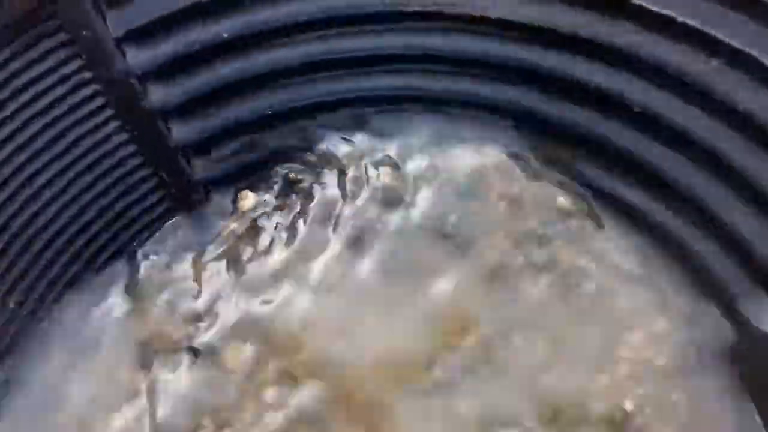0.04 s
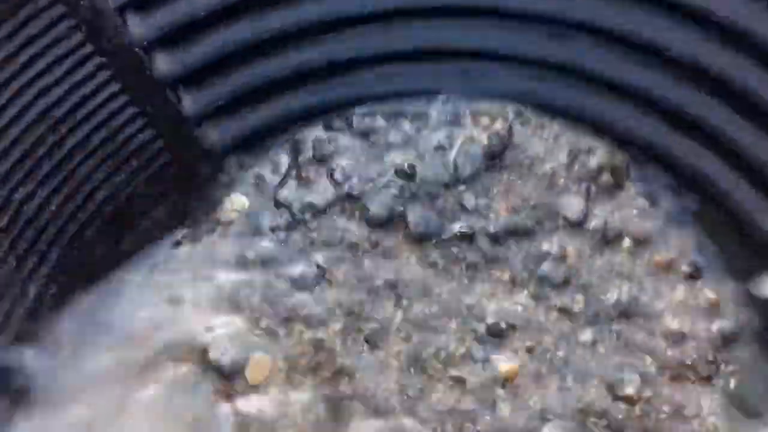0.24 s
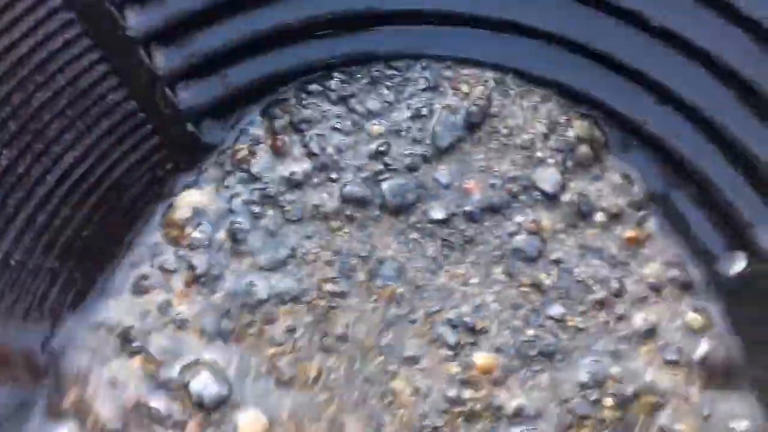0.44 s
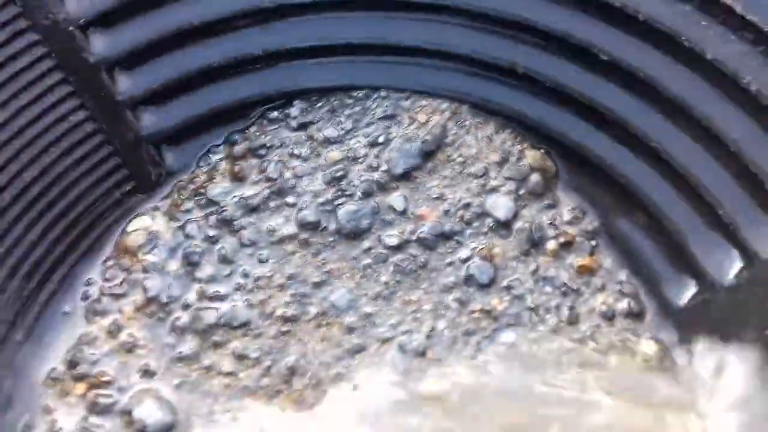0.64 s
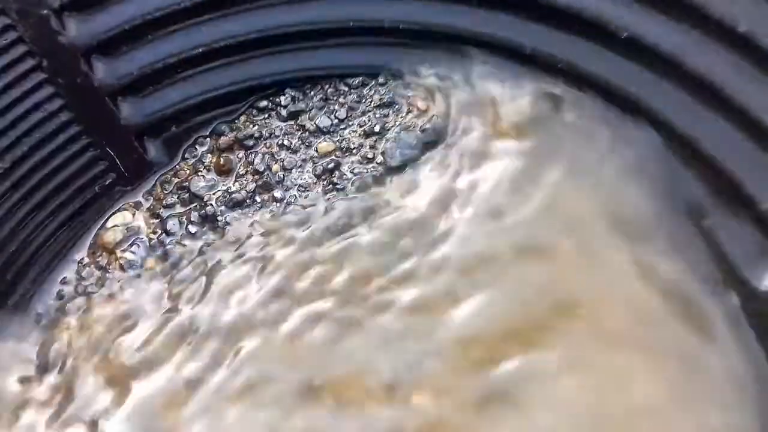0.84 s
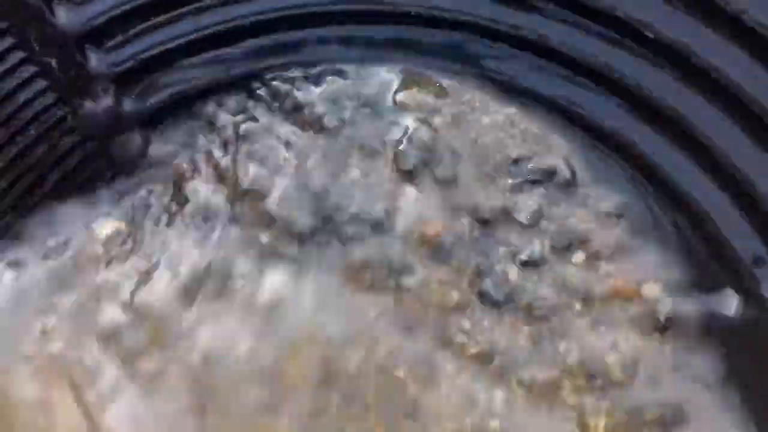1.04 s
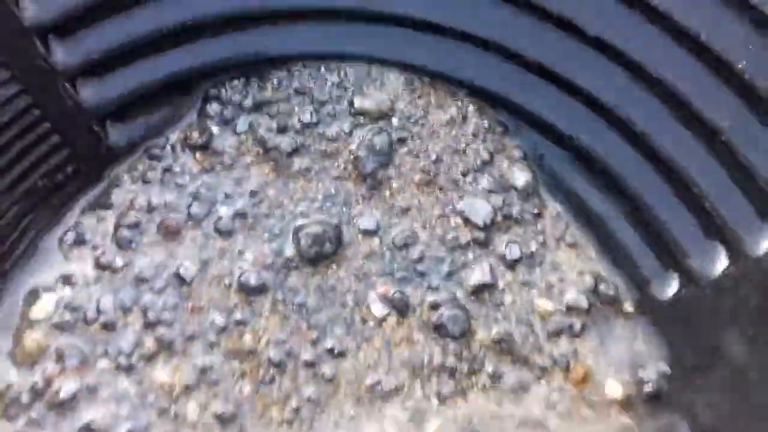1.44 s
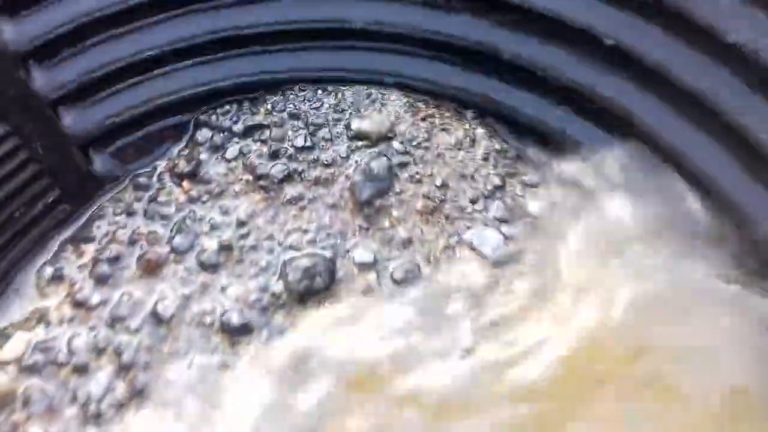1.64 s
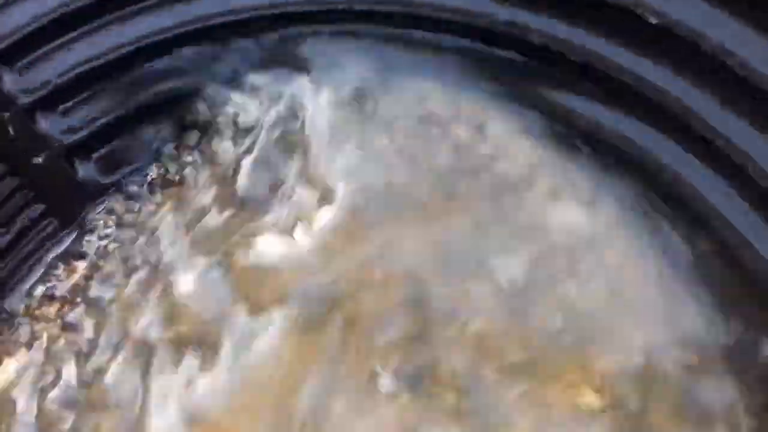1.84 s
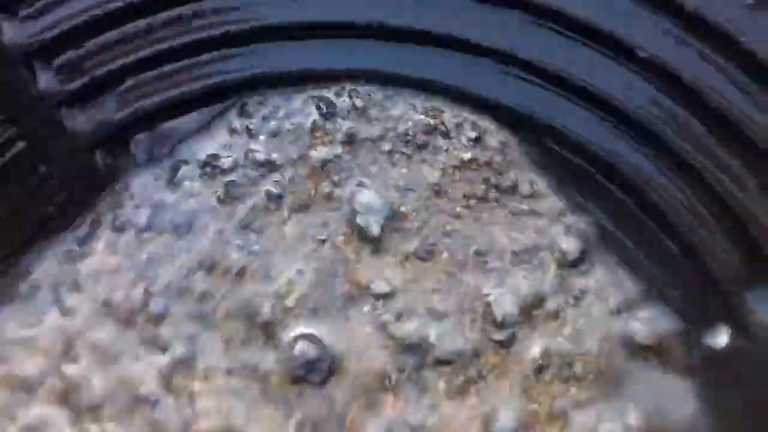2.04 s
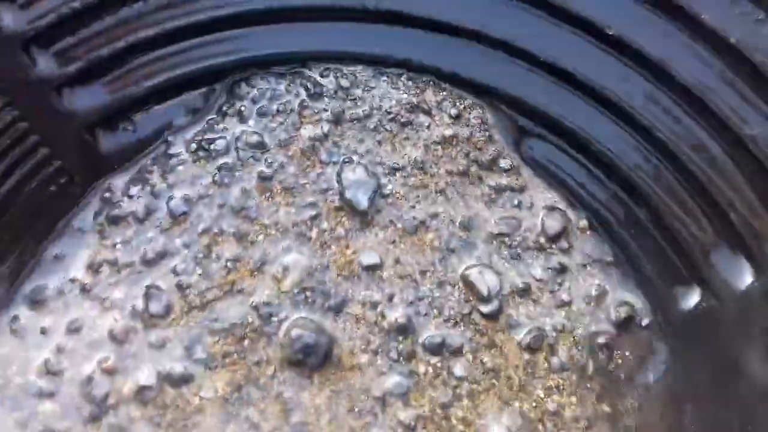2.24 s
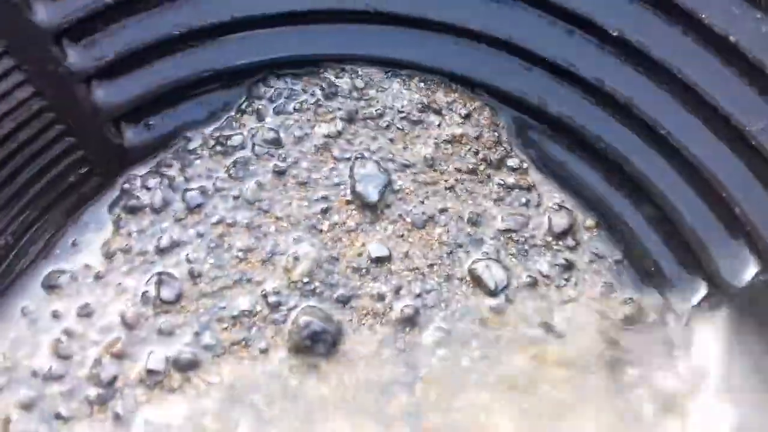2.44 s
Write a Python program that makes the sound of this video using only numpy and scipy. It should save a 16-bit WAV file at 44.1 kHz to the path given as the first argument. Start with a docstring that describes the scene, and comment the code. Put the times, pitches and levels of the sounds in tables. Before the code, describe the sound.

Close to a gold pan outdoors, wet grit swishes over the ribs in three quick surges. Pebbles knock and sand hisses as the water drains, while light trickling, small bubbles and a few stone ticks fill the gaps.

```python
"""Outdoors, close to a ribbed gold pan: muddy water and gravel are swirled round it three times.
Each swirl drags a sheet of grit over the pan, whose broad resonances colour it; larger pebbles knock
and bare sand hisses. Water trickles, gurgles and bubbles. Stones tick on the pan, which is bumped twice.
A faint low rumble and hiss lie behind."""
import sys
import numpy as np
from scipy import signal
from scipy.fft import rfft, irfft, next_fast_len
from scipy.io import wavfile
from scipy.ndimage import map_coordinates

SR = 44100
rng = np.random.default_rng(int(sys.argv[2]) if len(sys.argv) > 2 else 0)


def unload_wav(signal):
    """Save mono or channel-first audio to the path in sys.argv[1] as 16-bit WAV at rate SR, clipped to [-1, 1]."""
    wavfile.write(
        sys.argv[1],
        SR,
        np.round(np.clip(np.atleast_2d(signal).T, -1, 1) * 32767).astype(np.int16),
    )


N = 114660
TIME_S = np.arange(N) / SR
EVENT_S = TIME_S[:SR // 5]  # time axis of one short sound


def from_db(db):
    """Decibels to gain."""
    return 10 ** (np.asarray(db) / 20)


def rms_one(x):
    """Scale to unit rms."""
    return x / np.sqrt(np.mean(x ** 2) + 1e-20)


def envelope(points):
    """Gain from (t/s, level/dB) points, silent outside them."""
    s, db = np.transpose(points)
    return from_db(np.interp(TIME_S, s, db, left=-120, right=-120))


def drift(rate_hz):
    """Slow random curve, rms 1."""
    hop, settle = 40, 2000
    r = np.exp(-2 * np.pi * rate_hz * hop / SR)
    noise = rng.standard_normal(N // hop + settle + 2)
    slow = signal.lfilter([1], [1, -2 * r, r * r], noise)[settle:]
    return np.interp(np.arange(N) / hop, np.arange(len(slow)), rms_one(slow))


def colour(x, points, peaks=()):
    """Minimum-phase filter from (f/Hz, gain/dB) points and (f/Hz, width/Hz, boost/dB) resonances."""
    size = 2 * next_fast_len(x.shape[-1] // 2 + 4096)
    f = np.arange(size // 2 + 1) * SR / size + 1e-3
    hz, db = np.transpose(points)
    gain = from_db(np.interp(np.log(f), np.log(hz), db))
    for centre_hz, width_hz, boost_db in peaks:
        detune = 2 * (f - centre_hz) / width_hz
        gain *= np.sqrt(1 + (from_db(boost_db) ** 2 - 1) / (1 + detune ** 2))
    cepstrum = irfft(np.log(gain))
    cepstrum[1:size // 2] *= 2
    cepstrum[size // 2 + 1:] = 0
    return irfft(rfft(x, size) * np.exp(rfft(cepstrum)))[..., :x.shape[-1]]


def ring(clicks, hz, t60_s):
    """Resonator: a unit click starts a decaying sine of height 1."""
    r, w = from_db(-60 / (t60_s * SR)), 2 * np.pi * hz / SR
    return signal.lfilter([0, np.sin(w)], [1, -2 * r * np.cos(w), r * r], clicks + 1e-18)


def ping(hz, t60_s, rise=0, attack_cycles=1.35):
    """Swelling, decaying sine; pitch gains the fraction `rise` over t60."""
    t = EVENT_S
    swell = 1 - np.exp(-(t * hz / attack_cycles) ** 2)
    glide = 1 + rise * np.minimum(t / t60_s, 2) / 2
    return swell * from_db(-60 * t / t60_s) * np.sin(2 * np.pi * hz * t * glide)


def grains(per_s, spread_db, cycles, low_hz, high_hz, pitches):
    """Random clicks, each ringing at one of several pitches with a t60 of `cycles`; rms 1."""
    sizes = from_db(spread_db * np.minimum(rng.exponential(1, N), 4)) * rng.choice([-1, 1], N)
    clicks = sizes * (rng.random(N) < per_s / SR)
    pitch_index = rng.integers(0, pitches, N)
    out = np.zeros(N)
    for k, hz in enumerate(np.geomspace(low_hz, high_hz, pitches)):
        ringing = ring(clicks * (pitch_index == k), hz, cycles / hz)
        out += np.sqrt(hz) * rms_one(np.diff(ringing, prepend=0))  # sqrt evens the spectrum
    return rms_one(out)


def add(out, start_s, x):
    """Mix x in at start_s."""
    i = int(start_s * SR)
    out[i:i + len(x)] += x[:N - i]


def background(rumble_db=-61, hiss_db=-67):
    """Centred rumble; independent hiss in each ear."""
    # spectra: f/Hz, gain/dB
    rumble_eq = [(25, -60), (60, -21), (95, -6), (130, 3), (170, -8), (300, -8.5), (700, -5), (1500, -7.5),
                 (4000, -19), (8000, -55)]
    hiss_eq = [(30, -25), (70, 7), (140, 9.5), (500, 9.5), (2000, -3), (5500, -4), (8000, -1), (10000, -10),
               (12000, -1), (16000, -8)]
    rumble = rms_one(colour(rng.standard_normal(N), rumble_eq))
    hiss = rms_one(colour(rng.standard_normal((2, N)), hiss_eq))
    return from_db(rumble_db) * rumble + from_db(hiss_db) * hiss


def trickle(wash_db=4):
    """Running water: small bubbles ring on a soft wash, coloured by the pan."""
    flow = [(0.0, -48.5), (0.07, -50), (0.6, -50), (0.78, -54.5), (0.96, -55.5), (1.05, -48.5), (1.5, -54),
            (1.6, -55.5), (1.86, -55.3), (2.35, -52.5), (2.48, -62), (2.52, -58.5), (2.6, -60)]  # t/s, level/dB
    water_eq = [(120, -13), (200, -22), (450, -11.5), (700, 0.5), (900, -5.5), (1500, -2.5), (2300, 1.5),
                (3300, -4.5), (4200, -9), (5100, -27.5), (8000, -41), (10000, -32)]  # f/Hz, gain/dB
    pan_modes = [(624, 116, 4), (2200, 110, 5.5)]  # f/Hz, width/Hz, boost/dB
    fizz = grains(per_s=2500, spread_db=0, cycles=33, low_hz=454, high_hz=6200, pitches=30)
    wash = from_db(wash_db) * rng.standard_normal(N)
    return envelope(flow) * rms_one(colour(fizz + wash, water_eq, pan_modes))


def gurgle():
    """The body of water gurgles in low, overlapping rings."""
    swell = [(0.0, -72), (0.08, -59.5), (0.25, -68.5), (0.38, -60), (0.5, -55.5), (0.6, -56), (0.66, -75),
             (1.0, -76), (1.1, -61), (1.48, -64.5), (1.6, -73), (1.95, -67), (2.05, -63.5), (2.35, -64.5),
             (2.5, -75)]  # t/s, level/dB
    gurgle_eq = [(130, -36.5), (200, 3.5), (280, 4.5), (380, 6), (550, -17.5)]  # f/Hz, gain/dB
    rings = grains(per_s=1200, spread_db=1.5, cycles=17.7, low_hz=193, high_hz=411, pitches=10)
    return envelope(swell) * rms_one(colour(rings, gurgle_eq))


def bare_sand(surge, attack_s=0.02, release_s=0.11):
    """Fine sand hisses where the water drains off."""
    bare_spans = [(0.0, 0.074, -57, 20), (0.267, 0.617, -57.5, -5), (1.19, 1.45, -50, 9),
                  (2, 2.35, -56, 11)]  # start/s, end/s, level/dB, fall/(dB/s)
    sand_eq = [(1500, -22), (3500, 12), (4400, 3.5), (5400, -16.5), (8000, -12), (9500, -26.5)]  # f/Hz, gain/dB
    contacts = grains(per_s=8900, spread_db=8.5, cycles=7.9, low_hz=3070, high_hz=9000, pitches=10)
    hiss = rms_one(colour(surge * contacts, sand_eq))
    out = np.zeros(N)
    for start_s, end_s, db, fall_db_per_s in bare_spans:
        age_s = TIME_S - start_s
        gate = np.clip(1 + np.minimum(age_s / attack_s, (end_s - TIME_S) / release_s), 0, 1)
        out += gate * from_db(db - fall_db_per_s * age_s) * hiss
    return out


def plops():
    """Single bubbles burst, each a ping of rising pitch."""
    bubbles = [(0.005, -46, 698, 0.027), (0.05, -63, 685, 0.021), (0.072, -31, 3700, 0.0075),
               (0.7592, -31, 2960, 0.012), (0.882, -41.5, 3750, 0.0091), (1.627, -40, 740, 0.036),
               (1.781, -39, 2150, 0.0094), (1.817, -43.5, 2150, 0.033)]  # t/s, level/dB, f/Hz, t60/s
    out = np.zeros(N)
    for s, db, hz, t60_s in bubbles:
        add(out, s, from_db(db) * ping(hz, t60_s, rise=0.22))
    return out


def wander(x, depth=0.02, rate_hz=7):
    """The shifting load pulls all resonances slightly up and down."""
    position = np.cumsum(1 + depth * drift(rate_hz))
    return map_coordinates(x, [position], order=3, mode="mirror")


def gravel(surge, sand_db=-6):
    """Grit slides over the pan in three swirls; the resonances depend on where the load lies."""
    # swirl envelopes: t/s, level/dB
    swirl_1 = [(0.0, -79), (0.14, -52), (0.2, -45), (0.28, -37), (0.41, -31.5), (0.45, -34.5), (0.52, -35),
               (0.57, -43.5), (0.62, -41.5), (0.69, -66), (0.78, -60)]
    swirl_2 = [(0.96, -68), (1.0, -53.5), (1.07, -53.5), (1.15, -41), (1.22, -35.5), (1.27, -34),
               (1.36, -34.5), (1.45, -38.5), (1.51, -56), (1.58, -62)]
    swirl_3 = [(1.86, -61), (1.93, -50), (1.99, -48), (2.02, -39.5), (2.2, -36.5), (2.27, -37.5),
               (2.33, -44.5), (2.39, -48.5), (2.415, -76)]
    # grit spectra: f/Hz, gain/dB
    grit_1 = [(120, -52), (180, -41), (240, -12), (450, -17), (850, -9.5), (1300, -2.5), (2200, 0.5),
              (3500, -5), (4300, -14), (5200, -25), (8000, -33.5), (10000, -43)]
    grit_2 = [(120, -10), (230, -23), (450, -10.5), (850, -13), (1300, -5), (2200, 4), (3500, -5.5),
              (4300, -16), (5200, -23), (8000, -34.5), (10000, -56)]
    grit_3 = [(120, -28), (230, -8.5), (450, -20), (620, -8.5), (850, -12.5), (1300, -6.5), (2200, 0.5),
              (3500, -9.5), (4300, -19), (5200, -28), (8000, -37.5), (10000, -52)]
    # wet pan resonances: f/Hz, width/Hz, boost/dB
    pan_1 = [(300, 46, 16), (640, 124, 10.5), (1130, 74, 11.5), (2130, 460, 5.5)]
    pan_2 = [(344, 22, 13), (650, 200, 5.6), (1133, 62, 15.7), (1872, 24, 6.8), (2150, 150, 4.9),
             (2420, 81, 3.5)]
    pan_3 = [(288, 42, 7.1), (640, 310, 5.4), (1170, 67, 6.7), (2200, 110, 3)]
    swirls = (swirl_1, grit_1, pan_1), (swirl_2, grit_2, pan_2), (swirl_3, grit_3, pan_3)
    out = np.zeros(N)
    for swirl, grit, pan in swirls:
        contacts = grains(per_s=5000, spread_db=2, cycles=5.7, low_hz=511, high_hz=8560, pitches=24)
        sand = from_db(sand_db) * rng.standard_normal(N)
        slide = colour((contacts + sand) * surge, grit, pan)
        out += envelope(swirl) * rms_one(wander(slide))
    return out


def pebbles(ping_cycles=19, grind_s=0.0026, grind_db=-1.5, muffle_hz=(927, 3300)):
    """Each pebble grinds briefly over a rib, muffled by water, pings and sounds the pan."""
    knocks = [(0.297, -27, 2000), (0.393, -21.5, 1790), (0.402, -39, 1770), (0.4105, -23, 2150),
              (0.4143, -28, 1940), (0.4205, -19.5, 1840), (0.4228, -27, 2150), (0.4492, -25.5, 2130),
              (0.496, -32, 1980), (1.122, -30.5, 2040), (1.150, -35, 2000), (1.228, -28, 2180),
              (1.251, -24, 2020), (1.267, -27, 2150), (1.346, -30, 2150), (1.355, -26.5, 2130),
              (1.942, -33.5, 2300), (1.958, -31.5, 2320), (1.978, -30.5, 2350), (2.003, -26.5, 2320),
              (2.048, -33, 2100), (2.098, -26.5, 1950), (2.132, -29.5, 2040), (2.161, -36.5, 2100),
              (2.174, -33, 2150), (2.187, -29, 2030), (2.195, -35, 2120), (2.200, -25.5, 2090),
              (2.2185, -25, 2180), (2.2956, -33, 2140), (2.321, -35.5, 2200), (2.343, -32.5, 2020)]  # t/s, level/dB (energy as rms over 1 ms), f/Hz
    pan_modes = [(720, -13.5, 0.032), (1190, -5.5, 0.0044)]  # f/Hz, level/dB, t60/s
    pan = sum(from_db(db) * rms_one(ping(hz, t60_s)) for hz, db, t60_s in pan_modes)
    contact = EVENT_S / grind_s * np.exp(-(EVENT_S / grind_s) ** 2)
    muffle = signal.butter(6, muffle_hz, "band", fs=SR, output="sos")
    out = np.zeros(N)
    for s, db, hz in knocks:
        grind = rms_one(signal.sosfilt(muffle, contact * rng.standard_normal(len(EVENT_S))))
        knock = rms_one(ping(hz, ping_cycles / hz)) + pan + from_db(grind_db) * grind
        energy_ms = np.sum(knock ** 2) * 1000 / SR
        add(out, s, from_db(db) * knock / np.sqrt(energy_ms))
    return out


def stone_ticks(t60_s=0.0083):
    """Stone strikes the pan: hard noise bursts, duller under water."""
    strikes = [(0.759, -39, 3750), (0.945, -33.5, 4730), (0.9850, -27.5, 10500), (1.494, -39, 8600)]  # t/s, peak/dB, cutoff/Hz
    tick_eq = [(300, -27), (1200, 14.5), (4200, 11.5), (5500, -6), (8500, -4), (11500, -23)]  # f/Hz, gain/dB
    out = np.zeros(N)
    for s, db, cutoff_hz in strikes:
        burst = rng.standard_normal(len(EVENT_S)) * from_db(-60 * EVENT_S / t60_s)
        lowpass = signal.butter(8, cutoff_hz, fs=SR, output="sos")
        tick = signal.sosfilt(lowpass, colour(burst, tick_eq))
        add(out, s, from_db(db) * tick / np.abs(tick).max())
    return out


def bumps():
    """The pan is bumped twice: two low, damped tones each time."""
    tones = [(0.9926, -29.5, 280, 0.011), (0.9958, -34, 137, 0.028), (1.222, -41.5, 124, 0.07),
             (1.237, -42, 75.4, 0.088)]  # t/s, level/dB, f/Hz, t60/s
    out = np.zeros(N)
    for s, db, hz, t60_s in tones:
        swell = 1 - np.exp(-2 * EVENT_S * hz)
        add(out, s, from_db(db) * swell * ring(EVENT_S == 0, hz, t60_s))
    return out


def scene(surge_db=0.73, surge_hz=16, low_cut_hz=66):
    """The pan is straight ahead; gravel and sand share the same small surges."""
    surge = from_db(surge_db * drift(surge_hz))
    solids = gravel(surge) + bare_sand(surge) + pebbles()
    water = trickle() + gurgle() + plops()
    low_cut = signal.butter(2, low_cut_hz, "high", fs=SR, output="sos")
    handling = signal.sosfilt(low_cut, stone_ticks() + bumps())
    return solids + water + handling + background()


def record(dry):
    """Steep low-pass."""
    cutoff_hz = 15750
    return signal.sosfilt(signal.ellip(12, 0.1, 70, cutoff_hz, fs=SR, output="sos"), dry)


dry = scene()
out = record(dry)
unload_wav(out)
```